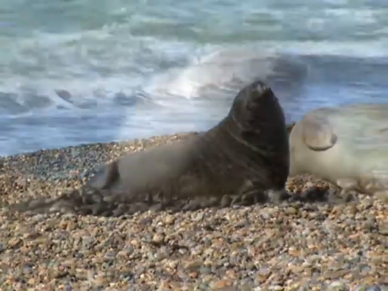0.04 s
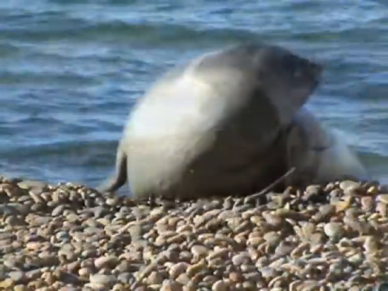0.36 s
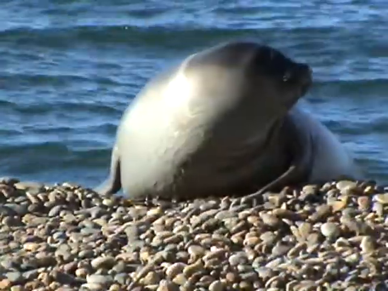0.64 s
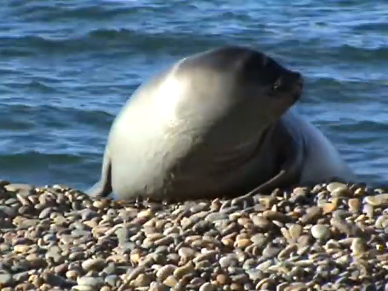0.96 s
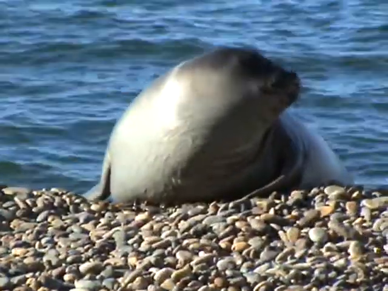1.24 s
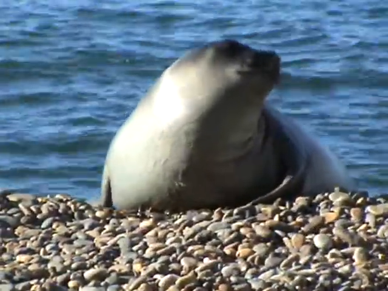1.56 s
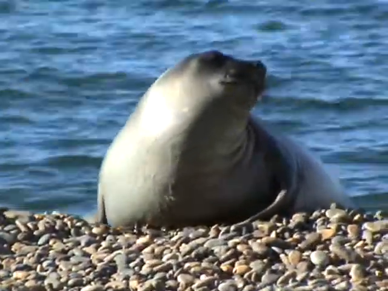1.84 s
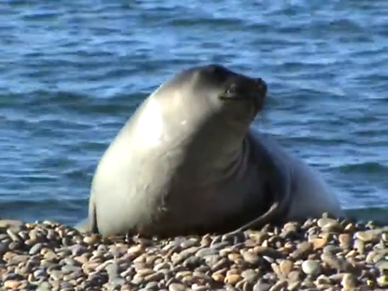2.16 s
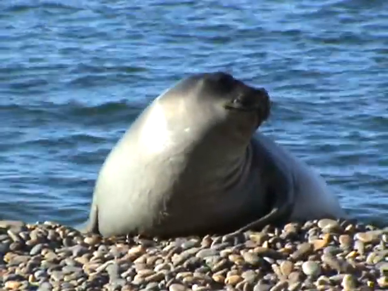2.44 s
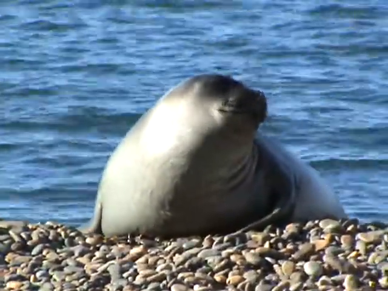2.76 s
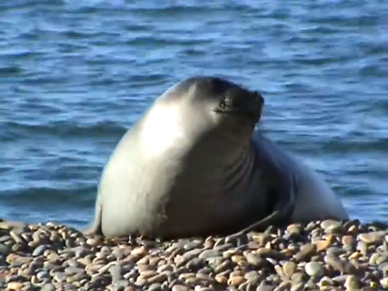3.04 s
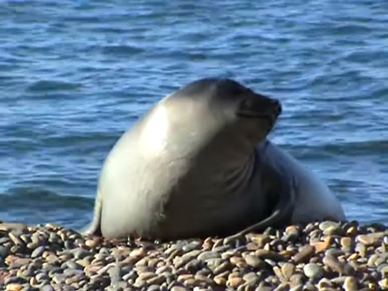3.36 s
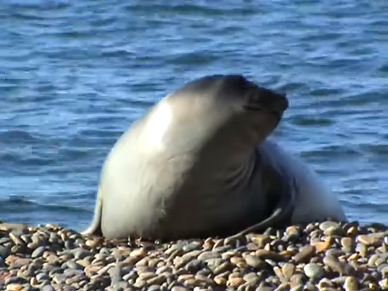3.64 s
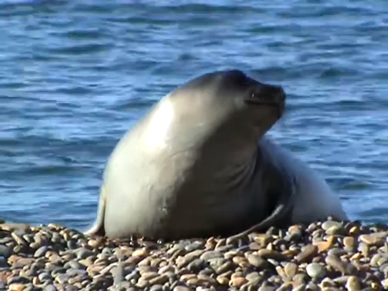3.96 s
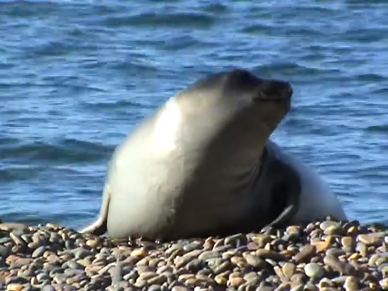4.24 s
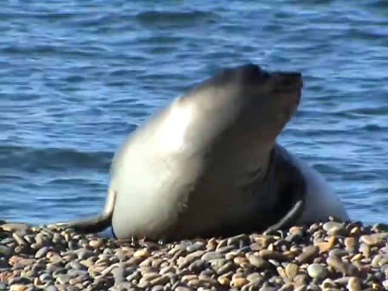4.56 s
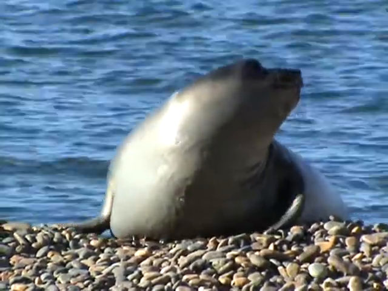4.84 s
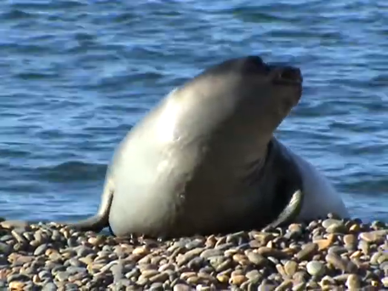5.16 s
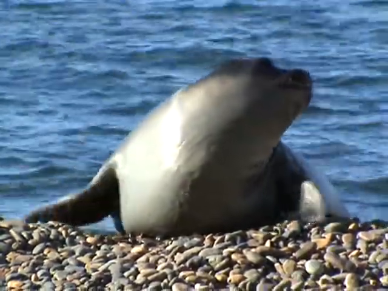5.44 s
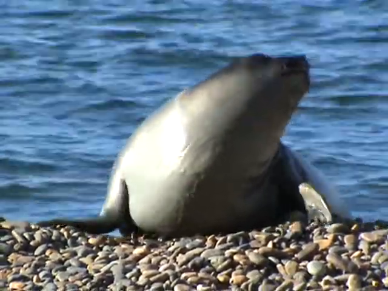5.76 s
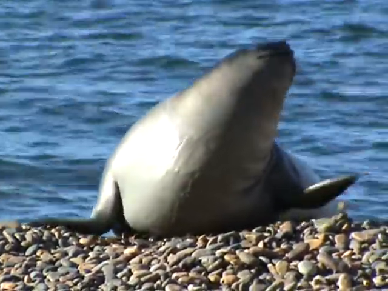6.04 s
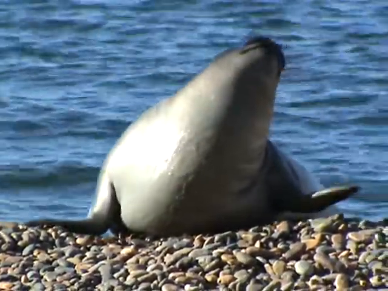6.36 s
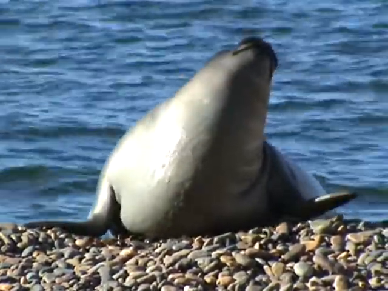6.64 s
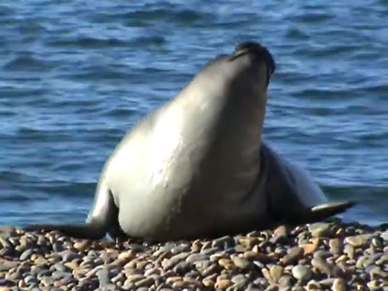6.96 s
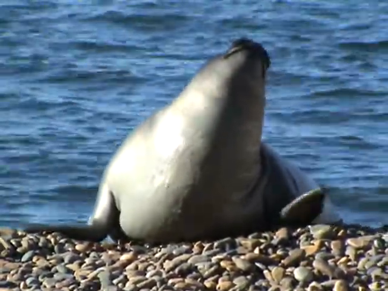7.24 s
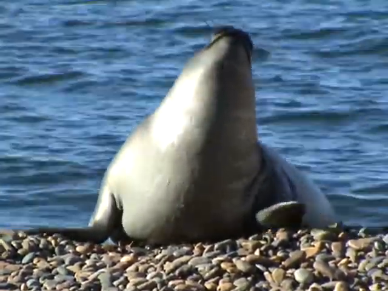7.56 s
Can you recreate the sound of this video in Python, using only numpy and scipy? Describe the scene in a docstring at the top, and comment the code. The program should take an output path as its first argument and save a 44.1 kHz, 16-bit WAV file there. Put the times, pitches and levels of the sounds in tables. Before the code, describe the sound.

Wind buffets the microphone in uneven low gusts throughout, with soft surf washing behind it. At the start a wave drains through shingle, fading by 0.8 seconds. Pebbles knock together at about 0.2, 0.7 and 1.9 seconds. Around 2.5 seconds a young seal softly clicks its throat, four tiny faint peeps sound far away, and the wind thumps twice. From 3.4 seconds the seal, close and slightly right, gives eight slow, rattling growls, each a string of wet, throaty snaps. The first two, at 3.4 and 3.8 seconds, are very brief. Longer, louder ones come at about 4.3, 4.7, 5.3, 5.8 and 6.4 seconds, with single throat clicks between. Its flipper shifts small stones from 5.5 to 6.3 seconds, with a sharp click near 6.2, and again faintly after 7.2. A last, weaker growl runs from 7.3 to 7.6 seconds.

```python
"""A wave drains through the shingle of a beach and a few pebbles knock together.
A young elephant seal clicks its throat while something peeps faintly in the distance.
Then come eight slow, rattling growls, made of single snaps of the larynx that ring the throat;
during the later ones its flipper shifts small stones. Surf washes behind it all the way through,
and wind buffets the microphone."""
import sys
import numpy as np
from scipy import signal
from scipy.fft import rfft, irfft, next_fast_len
from scipy.io import wavfile
from scipy.ndimage import uniform_filter1d, map_coordinates

SR = 44100
rng = np.random.default_rng(int(sys.argv[2]) if len(sys.argv) > 2 else 0)


def waveform_to_disk(signal):
    """Save audio, clipped to [-1, 1], as 16-bit WAV at the path in sys.argv[1]."""
    frames = np.transpose(np.atleast_2d(signal))
    scaled = np.clip(frames, -1, 1) * 32767
    samples = np.round(scaled).astype(np.int16)
    wavfile.write(sys.argv[1], SR, samples)


N = 335160

# EQ of the wet spatter: freq_hz, gain_db
SPATTER_EQ = [(1500, -39), (2200, 2.5), (2600, 12.5), (2950, -7), (3500, 1.5), (4200, -3.5), (4700, -9),
              (5600, -5.5), (6600, -7.5), (7500, -23), (11000, -39)]
# the seal's pan, right of centre: freq_hz, left_minus_right_db
SEAL_PAN = [(400, -2), (550, -1.5), (850, -5), (2200, -6.5), (3000, -5.5), (6000, -7.5), (10000, -9)]

def seal():
    """Each snap rings the throat, and the wet folds spatter for a few milliseconds around it."""
    times, db, mouth_hz, bright_db, low_db = larynx(scatter_db=1.6)
    snaps = throat(mouth_hz[:, None], bright_db[:, None], low_db[:, None]) * amp(db + 16)[:, None]
    voice = on_beach(times, snaps, scatter_db=-16, t60_s=.022)
    t = np.arange(SR // 80) / SR
    burst = (t / .0011) ** 2 * np.exp(-t / 0.00097)
    gate = laid(times - .0008, amp(db + bright_db / 2)[:, None] * burst)
    spatter = amp(-7) * gate * rush(SPATTER_EQ, [(1000, 0.61)], patchy_db=3.5)
    return panned(voice + spatter, SEAL_PAN)


# growl cues: start_s, crest_s, end_s, start_rate_hz, crest_rate_hz, end_rate_hz, hold_db, swell_db,
# fade_db, mouth_hz, bright_db, dulling_db_per_s, low_resonance_db
GROWL_CUES = [(3.409, 3.427, 3.455, 56, 52, 49, -29, 4, 3, 1110, -11, 60, 16.5),
              (3.828, 3.891, 3.946, 59, 38, 35, -28.5, 7.5, 5, 1135, 1, 2, 16),
              (4.317, 4.496, 4.621, 46.9, 48.2, 42.9, -25, 8.5, 3.5, 1180, -0.5, 4, 4),
              (4.7208, 4.944, 5.14, 42.9, 51.8, 25.6, -22, 13.5, 7, 1160, -1.5, 12, 1.5),
              (5.314, 5.4636, 5.766, 35.4, 47.5, 24.5, -22, 3, 8.5, 1160, -4, 2, 2),
              (5.7936, 5.975, 6.139, 34.2, 49.7, 30, -20.5, 4.5, 1, 1118, -11, 40, 1),
              (6.421, 6.454, 6.702, 38, 56.8, 30, -24, 4, 2.5, 1040, -10, 51, 8.5),
              (7.267, 7.31, 7.57, 24.8, 38.3, 22, -34.5, -3.5, 4.5, 1130, 5, 5, 11)]
# lone throat clicks: start_s, level_db, bright_db, low_resonance_db
CLICK_CUES = [(2.4, -30, -24, 10), (2.567, -36, -8, 0), (2.651, -37, -20, 2), (4.268, -28.5, 5, 14),
              (4.288, -34, 5, 7), (5.190, -29, 6.5, -9), (5.271, -26.5, 5.5, -4), (6.211, -31, -23, -19),
              (6.351, -30.5, -3.5, -10), (6.407, -29, -16, -7), (6.764, -35, -1, 6), (6.835, -34.5, -7, 0),
              (7.018, -36, 7, 6), (7.067, -34.5, -4, 3)]

def larynx(scatter_db):
    """Time, level and tone of every snap, alone or in a growl; no two are equally strong."""
    rest_mouth_hz = 1180
    clicks = [(s, db, rest_mouth_hz, bright_db, low_db) for s, db, bright_db, low_db in CLICK_CUES]
    growls = [growl(*cue) for cue in GROWL_CUES]
    times, db, mouth_hz, bright_db, low_db = np.vstack([clicks] + growls).T
    return times, db + scatter_db * rng.standard_normal(len(times)), mouth_hz, bright_db, low_db


def growl(start, crest, end, start_rate, crest_rate, end_rate,
          hold_db, swell_db, fade_db, mouth_hz, bright_db, dulling, low_db):
    """One push of effort, a row per snap: most growls speed up to a crest, and all slow after it."""
    attack_s, release_s = 0.096, 0.13
    tremor_hz, tremor_db = 9.23, 1.5
    sink_hz_per_db, reopen_hz = 5, 120
    rate = lambda at: np.interp(at, [start, crest, end], [start_rate, crest_rate, end_rate])
    t = np.arange(start, end, 1 / SR)
    count = np.cumsum(rate(t)) / SR
    times = np.interp(np.arange(count[-1]), count, t)  # a snap at each whole count
    attack = np.interp(times - start, [0, attack_s], [1, 0])
    release = np.interp(end - times, [0, release_s], [1, 0])
    throb_db = -tremor_db * np.cos(2 * np.pi * tremor_hz * (times - crest))
    level_db = hold_db - swell_db * attack - fade_db * release + throb_db
    closing_db = dulling * (times - crest)  # the closing mouth dulls and lowers the tone
    mouth_hz = mouth_hz - sink_hz_per_db * closing_db + reopen_hz * release ** 2
    bright_db = bright_db - closing_db + .25 * throb_db  # a harder snap is sharper
    slack = 1 - rate(times) / rate(t).max()  # slower snaps lose low end
    return np.c_[times, level_db, mouth_hz, bright_db, low_db - 12.5 * slack]


# throat formants, lowest first: centre_hz, width_hz, level_db, db_per_bright_db
FORMANTS = [(510, 224, -0.5, 0.19), (1140, 260, 0.5, 0.023), (1478, 194, 1.5, 0.65), (1810, 405, 0.5, 1),
            (2657, 160, -7.5, 2.2), (3300, 2100, -14.5, 1.6), (4150, 420, -15, 1.9),
            (4950, 450, -26.5, 0.3), (5560, 690, -25.5, 0.39), (7000, 890, -38.5, 4),
            (8300, 1000, -33, 1.4)]

def throat(mouth_hz, bright_db, low_db):
    """The ring of each snap; as the mouth closes, upper formants fade and middle ones sink."""
    hz = np.fft.rfftfreq(2048, 1 / SR)
    jitter = rng.standard_normal((len(mouth_hz), len(FORMANTS)))
    power = 0
    for k, (centre, width, level_db, tracking) in enumerate(FORMANTS):
        unsteady_db = centre / 2200 * jitter[:, k, None]
        level_db = level_db + tracking * bright_db + unsteady_db + (low_db if k == 0 else 0)
        if k in (1, 2, 3):
            centre = centre * mouth_hz / FORMANTS[1][0]
        resonance = np.abs(centre * width / (centre ** 2 - hz ** 2 + 1j * hz * width))
        power = power + (amp(level_db) * resonance ** 2) ** 2  # two stages for steep skirts
    body_eq = [(100, -7), (380, -22), (500, 3), (750, 3), (1000, -0.5)]
    rings = struck(np.sqrt(power) * amp(along(body_eq, hz)))
    ground_delay_s = .00086  # the ground bounce cuts shallow notches
    spectra = rfft(rings) * (1 + 0.13 * np.exp(-2j * np.pi * hz * ground_delay_s))
    upper_rms = np.sqrt(np.mean(np.abs(spectra * (hz > 800)) ** 2, axis=1, keepdims=True))
    return irfft(spectra / upper_rms)


# single pebble hits: start_s, level_db, low_knock_db
PEBBLE_HITS = [(0.1667, -26.5, -14), (0.66, -19, 12), (1.693, -35, 4), (1.908, -20, 21), (5.468, -30, -18),
               (5.5721, -27.5, -16), (5.6176, -34, -18), (6.043, -29, -18), (6.050, -35, -18),
               (6.104, -38, -18), (6.1514, -18, -12), (6.1948, -33, -18), (6.285, -25.5, -9),
               (7.1614, -37, -21)]
# the flipper shifting small stones: start_s, end_s, stones_per_s, level_db
FLIPPER_MOVES = [(5.454, 5.763, 240, -49), (6.03, 6.118, 140, -41), (6.169, 6.315, 70, -41),
                 (7.192, 7.593, 45, -50.5)]
# EQ of a stone's click: freq_hz, gain_db
STONE_EQ = [(500, -30), (2500, -25), (4000, -0.5), (6000, 4), (8000, -3), (10300, -2.5), (12500, -16),
            (16000, -23)]
# treble cut on heavy hits: freq_hz, db_per_knock_db
HEAVY_HIT_CUT = [(6000, 0), (11000, -1.2)]

def pebbles():
    """Stones click together, each in its own colour; small ones tick where the flipper pushes."""
    hits = [np.array(PEBBLE_HITS)]
    for start, end, rate, db in FLIPPER_MOVES:
        count = max(int((end - start) * rate), 1)
        tick_times = rng.uniform(start, end, count)
        hits.append(np.c_[tick_times, db + 4 * rng.standard_normal(count), np.full(count, -20)])
    times, db, knock_db = np.concatenate(hits).T
    hz = np.fft.rfftfreq(1024, 1 / SR)
    colour_db = unit(uniform_filter1d(rng.standard_normal((len(times), len(hz))), size=14, axis=1))
    knock_eq = [(200, -35), (600, 11), (1200, 5.5), (3000, -3), (8000, -21)]
    knock = amp(knock_db[:, None] + along(knock_eq, hz) + colour_db)
    dull_db = np.maximum(knock_db, 0)[:, None] * along(HEAVY_HIT_CUT, hz)
    clicks = struck(amp(along(STONE_EQ, hz) + dull_db + 2 * colour_db) + knock)
    clicks *= (amp(db + 9.5) / np.linalg.norm(clicks, axis=1))[:, None]
    return on_beach(times, clicks, scatter_db=-3.5, t60_s=0.006) * amp([[-1], [1]])


# gust fader: time_s, level_db
GUST_FADER = [(0.0, -24.0), (0.45, -27.5), (0.72, -25), (0.78, -30), (0.9, -26), (1.11, -34.5),
              (1.26, -27.5), (1.44, -35.5), (1.65, -29), (1.71, -43), (1.77, -26), (2.4, -29), (2.58, -24),
              (3.06, -31), (3.12, -40), (3.36, -30.0), (3.42, -37.5), (3.63, -26.5), (3.81, -35),
              (3.87, -23), (3.96, -29.5), (4.08, -21.5), (5.13, -31.5), (5.19, -24), (5.34, -37.5),
              (5.43, -30.0), (5.61, -37.5), (5.79, -32.0), (6.36, -35.5), (6.42, -44), (6.45, -35.5),
              (6.54, -24.5), (6.69, -28.0), (7.23, -33.0), (7.29, -26), (7.59, -22)]
# low and high layers, riding on the gust fader: time_s, rumble_db, flutter_db
GUST_TRIMS = [(0.0, -1, -6), (0.78, -10, -1.0), (0.9, -17, -3), (1.32, -7.5, -3.0), (2.82, -14, -5.0),
              (3.12, -6, -4.5), (3.3, -11.5, -5.5), (5.19, -9, -4), (5.55, 6, -12.5), (6.0, -3, -15.5),
              (6.36, 3, -19), (6.45, 0.5, -5), (6.96, 0, -12), (7.59, -13, -3)]
# EQs of the low, middle and high wind layers: freq_hz, gain_db
RUMBLE_EQ = [(15, -26), (28, -6), (42, -4), (68, 1.5), (90, -6.5), (150, -21), (400, -101)]
BUFFET_EQ = [(50, -31), (80, -7), (115, 0), (150, -0.5), (185, -4.5), (230, -19.5), (320, -15), (800, -89)]
FLUTTER_EQ = [(130, -16), (190, -2), (225, -1.5), (290, -7.5), (380, -12.5), (520, -18), (750, -26),
              (1500, -41), (5000, -76)]
# single eddies hitting the microphone: centre_s, pitch_hz, level_db
THUMP_CUES = [(0.704, 106, -15.5), (2.478, 129, -12), (2.578, 136, -10.5), (6.551, 118, -10)]
# the wind's stereo image: freq_hz, correlation
WIND_IMAGE = [(30, 0.71), (70, 0.41), (130, 0.63), (290, -0.24), (600, -0.48)]
# the wind's pan: freq_hz, left_minus_right_db
WIND_PAN = [(30, -16), (80, 3), (150, 3), (300, 0)]

def wind():
    """Large and small eddies buffet the microphone's two ports; a few strike as single thumps."""
    gust_db = curves(GUST_FADER)[0] + 0.87 * wobble(18)
    rumble_db, flutter_db = gust_db + np.array(curves(GUST_TRIMS))
    lumps = 1.83 * np.array([wobble(40), wobble(40)])  # each side flickers on its own
    rumble = evened(rush(RUMBLE_EQ, WIND_IMAGE, patchy_db=-1), seconds=0.077)
    rumble *= amp(rumble_db - 0.86)
    buffet = evened(rush(BUFFET_EQ, WIND_IMAGE, patchy_db=1.56), seconds=.07)
    buffet *= amp(gust_db - 1.65 + 0.95 * lumps)
    flutter = amp(flutter_db - 1.7 + 1.08 * lumps) * rush(FLUTTER_EQ, WIND_IMAGE, patchy_db=1.3)
    thumps = 0
    for centre_s, hz, db in THUMP_CUES:
        cycles = (np.arange(N) / SR - centre_s) * hz
        thumps += amp(db) * np.exp(-(cycles / 0.66) ** 2) * np.sin(2 * np.pi * cycles)
    return panned(rumble + buffet + flutter + thumps, WIND_PAN)


# surf faders, moving as small waves arrive: time_s, roar_db, wash_db, foam_db
SURF_FADERS = [(0, -44, -46.5, -59), (.42, -46.5, -46.5, -51.5), (.85, -53, -42, -48.5),
               (1.52, -57, -43, -51), (2.05, -51, -45.5, -50.5), (2.65, -49.5, -48.5, -55.5),
               (3.85, -47, -46.5, -57), (4.38, -44.5, -46, -54.5), (5.3, -49.5, -49, -59),
               (5.9, -51, -51, -61), (6.9, -48.5, -54.5, -63.5), (7.25, -50, -48.5, -59.5),
               (7.6, -50.5, -52.5, -57.5)]
# fade of the draining wave: time_s, level_db
DRAIN_FADER = [(0, -36.5), (.18, -42), (.35, -44.5), (.5, -50.5), (.65, -59), (.8, -110)]
# EQs of the low, middle and high surf and of the draining shingle: freq_hz, gain_db
ROAR_EQ = [(250, -4), (420, -7.5), (520, 3.5), (640, -5.5), (820, -2.5), (1050, -2), (1400, -8),
           (3000, -40)]
WASH_EQ = [(600, -10), (850, -5.5), (1100, 2.5), (1350, 1), (1650, 1.5), (1900, -1), (2150, -5.5),
           (2600, -7.5), (3500, -13.5), (7000, -62)]
FOAM_EQ = [(1500, -4), (2400, 2), (3100, 1), (3900, 3.5), (4700, -2.5), (5800, -6), (7500, -14.5),
           (10000, -26), (15000, -46)]
SHINGLE_EQ = [(300, -3), (700, 11), (1300, -0.5), (3000, 3), (5000, -1.5), (6900, 1), (8500, -4.5),
              (10500, -11), (13000, -27), (16000, -42)]
# the sea's stereo image: freq_hz, correlation
SEA_IMAGE = [(300, 0.26), (640, 1), (1300, 0.88), (3100, 0.71), (7000, 0.61), (15000, .75)]
# pan of the surf and the peeps: freq_hz, left_minus_right_db
DISTANT_PAN = [(400, 4.5), (700, -2.5), (1300, -2), (2400, -3.5), (4400, -4), (8000, -13), (15000, 1)]

def sea():
    """A bed of small waves roars, washes and foams; one larger wave drains through the shingle."""
    roar_db, wash_db, foam_db = curves(SURF_FADERS)
    roar = amp(roar_db + 0.5) * rush(ROAR_EQ, SEA_IMAGE, patchy_db=3.5)
    wash = amp(wash_db + 0.68 * wobble(8.7)) * rush(WASH_EQ, SEA_IMAGE, patchy_db=1.17)
    foam = amp(foam_db + 1 + 0.12 * wobble(6.7)) * rush(FOAM_EQ, SEA_IMAGE, patchy_db=1.25)
    drain = amp(curves(DRAIN_FADER)[0]) * rush(SHINGLE_EQ, SEA_IMAGE, patchy_db=0.3)
    return panned(roar + wash + foam, DISTANT_PAN) + drain


# faint peeps: centre_s, pitch_hz, level_db
PEEP_CUES = [(2.454, 3120, -42), (2.515, 3280, -44), (2.570, 3300, -41), (2.630, 3240, -47)]

def peeps():
    """Soft, short whistles far away."""
    t = np.arange(N) / SR
    whistles = sum(amp(db) * np.exp(-((t - s) / 0.0031) ** 2) * np.sin(2 * np.pi * hz * t)
                   for s, hz, db in PEEP_CUES)
    return panned(whistles, DISTANT_PAN)


def on_beach(times, shapes, scatter_db, t60_s):
    """One-shots in stereo, each with its own brief tail scattered by the stones around."""
    t = np.arange(SR // 20) / SR
    fade_in = 1 - np.exp(-(t / 0.0058) ** 2)
    tails = rng.standard_normal((2, len(times), len(t))) * amp(-60 * t / t60_s) * fade_in
    tails = tails + 1.9 * tails.mean(axis=0)  # the close ports hear much the same scatter
    tails *= amp(scatter_db) / np.linalg.norm(tails, axis=2, keepdims=True)
    tails[..., 0] = 1  # direct sound
    return np.array([laid(times, signal.fftconvolve(shapes, tail, axes=1)) for tail in tails])


def laid(times, shapes):
    """One-shots, one a row, mixed in at their times."""
    index = np.round(np.abs(times) * SR).astype(int)[:, None] + np.arange(shapes.shape[1])
    return np.bincount(index.ravel(), shapes.ravel(), N)[:N]


def struck(gain):
    """Minimum-phase impulse responses with the given magnitudes, one a row."""
    cepstrum = irfft(np.log(np.maximum(gain, 1e-6)))
    half = cepstrum.shape[-1] // 2
    causal_fold = np.r_[1, np.full(half - 1, 2), 1, np.zeros(half - 1)]
    return irfft(np.exp(rfft(cepstrum * causal_fold)))


def rush(eq, image, patchy_db):
    """Stereo noise, its mid at rms 1, with patches of random gain in time and frequency."""
    spectra = signal.stft(rng.standard_normal((2, N)), nperseg=512)[2]
    patches = uniform_filter1d(rng.standard_normal(spectra.shape[1:]), size=6, axis=0)
    patches = unit(uniform_filter1d(patches, size=14, axis=1))
    pair = signal.istft(spectra * amp(patchy_db * patches), nperseg=512)[1][:, :N]
    def mid_side_gains(hz):
        width = np.arccos(np.clip(along(image, hz), -1, 1)) / 2
        return amp(along(eq, hz)) * [np.cos(width), np.sin(width)]
    mid, side = filtered(pair, mid_side_gains)
    return np.array([mid + side, mid - side]) / np.std(mid)


def evened(x, seconds):
    """Noise compressed to near constant power, ready to take a gust's shape."""
    power = uniform_filter1d(np.mean(x ** 2, axis=0) / np.mean(x ** 2), size=int(seconds * SR))
    return x / np.sqrt(.8 * np.abs(power) + .2)


def panned(x, pan):
    """x shared between left and right, frequency by frequency."""
    def gains(hz):
        ratio = amp(along(pan, hz))
        return 2 * np.array([ratio, np.ones_like(ratio)]) / (1 + ratio)
    return filtered(x, gains)


def filtered(x, response):
    """x through a frequency response."""
    size = next_fast_len(N + SR // 2)
    return irfft(rfft(x, size) * response(np.fft.rfftfreq(size, 1 / SR)), size)[..., :N]


def wobble(rate_hz):
    """A smooth random modulator."""
    knots = rng.standard_normal(int(N * rate_hz / SR) + 4)
    return map_coordinates(knots, [np.arange(N) * rate_hz / SR])


def curves(rows):
    """Fader points to one curve per column after the time."""
    times, *faders = np.transpose(rows)
    return [np.interp(np.arange(N) / SR, times, fader) for fader in faders]


def along(points, hz):
    """Breakpoints read on a log frequency axis."""
    freqs, values = np.transpose(points)
    return np.interp(np.log(hz + 1), np.log(freqs + 1), values)


def unit(x):
    """x at rms 1."""
    return x / np.sqrt(np.mean(x ** 2) + 1e-20)


def amp(db):
    """Decibels to gain."""
    return 10 ** (np.asarray(db) / 20)


def scene():
    """The seal and its stones, in front of the sea, in the wind."""
    return seal() + pebbles() + peeps() + sea() + wind()


# EQ of the microphone's hiss: freq_hz, gain_db
HISS_EQ = [(2000, -28), (6000, 6), (10000, 0.5), (16000, -3)]

def record(dry):
    """The microphone adds a faint hiss and keeps nothing above its band limit."""
    top_hz = 15850
    hiss = amp(-65) * rush(HISS_EQ, [(1000, 0.71)], patchy_db=1)
    return filtered(dry + hiss, lambda hz: hz < top_hz)


dry = scene()
out = record(dry)
waveform_to_disk(out)
```